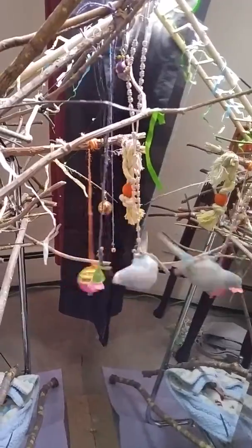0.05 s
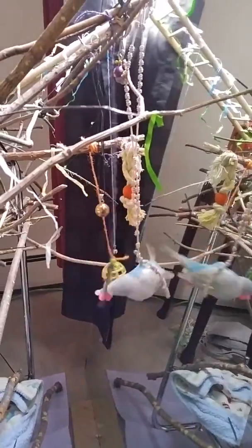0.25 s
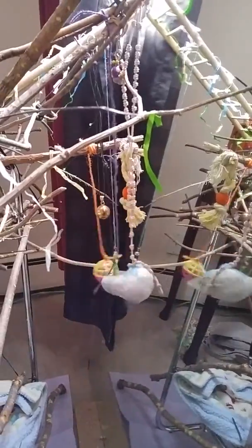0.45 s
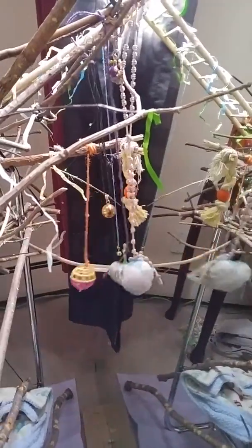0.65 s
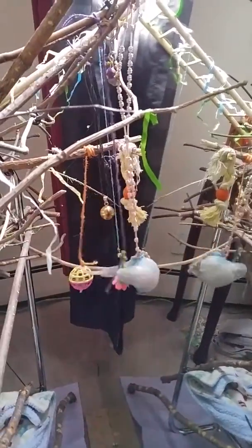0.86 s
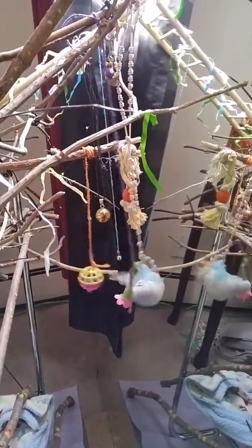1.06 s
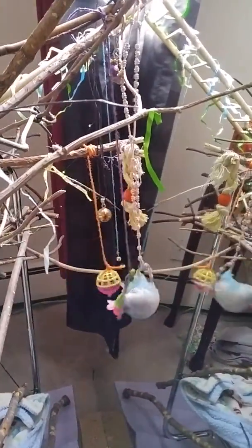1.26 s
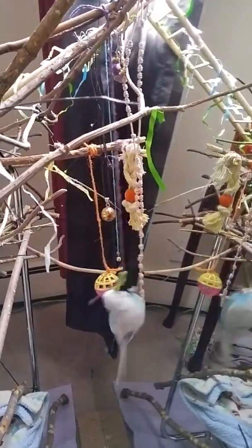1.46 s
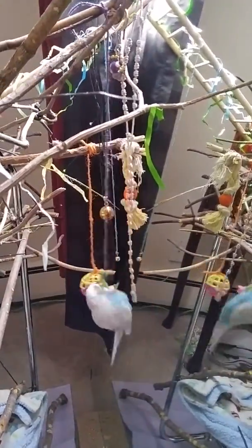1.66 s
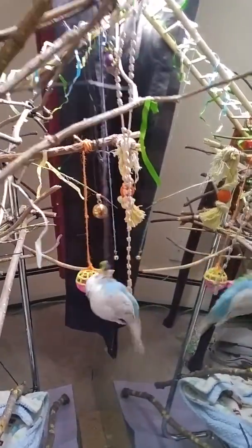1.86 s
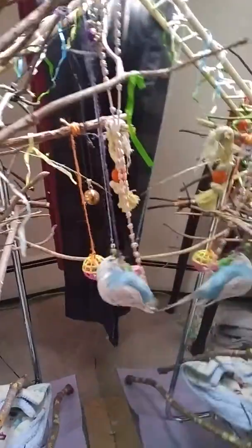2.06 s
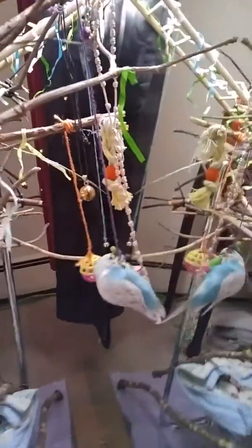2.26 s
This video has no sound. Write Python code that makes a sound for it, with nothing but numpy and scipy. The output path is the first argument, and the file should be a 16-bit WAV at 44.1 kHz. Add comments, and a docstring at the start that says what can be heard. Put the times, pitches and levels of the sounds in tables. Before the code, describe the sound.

High, uneven jingling of a bird's plastic bell ball, with some microphone rubbing at first.

```python
"""Budgie with a bell ball

In a small room a budgie shoves a hanging toy ball: the pellet strikes and rolls in its little bell,
ringing near 10 kHz, and the plastic cage rattles. Right up at the right microphone port something,
probably a finger, rubs and bumps at first. Behind it all, quiet room noise and a faint electrical tick."""
import sys
import numpy as np
from scipy import signal
from scipy.fft import rfft, irfft, next_fast_len
from scipy.io import wavfile
from scipy.ndimage import map_coordinates

SR = 44100
rng = np.random.default_rng(int(sys.argv[2]) if len(sys.argv) > 2 else 0)


def dump_mix(stems):
    """Bounce the given channels to the path in sys.argv[1] as a 16-bit WAV at rate SR."""
    frames = np.atleast_2d(stems).T  # one column per channel
    limited = np.clip(frames, -1, 1)  # hard clip at full scale
    pcm = np.round(limited * 32767).astype(np.int16)
    wavfile.write(sys.argv[1], SR, pcm)


N = 105840

# colour of the room noise (frequency [Hz], level [dB])
ROOM_COLOUR = [(25, 16.5), (50, 15.5), (100, -2), (250, -7.5), (480, -16), (700, -7), (1200, -15.5),
               (2500, -19), (5000, -19.5), (8000, -6), (12000, -19), (16000, -24.5)]
# drift of the room noise (time [s], level [dB])
ROOM_LEVEL = [(0, -61.5), (.8, -54.5), (1, -63), (1.22, -56.5), (1.4, -64.5), (1.8, -63), (2.1, -62.5),
              (2.4, -68)]
# strength of the electrical tick (time [s], level [dB])
TICK_LEVEL = [(.45, -43), (.8, -32.5), (1.1, -41.5), (2.4, -42)]
# course of the rub's body (time [s], level [dB])
RUB_LEVEL = [(0, -74), (.09, -53), (.2, -51), (.3, -52.5), (.34, -47), (.41, -53.5), (.45, -45.5),
             (.54, -44), (.61, -48), (.66, -42), (.75, -54), (.85, -63.5), (.98, -86), (1.15, -68),
             (1.28, -74), (1.35, -80), (1.72, -72), (1.95, -84.5)]
# firmness of the slide, driving hiss and rumble (time [s], level [dB])
RUB_FIRMNESS = [(0, -89), (.12, -80), (.24, -60), (.29, -72.5), (.358, -61.5), (.41, -73.5), (.536, -51.5),
                (.61, -56), (.686, -51.5), (.77, -68), (.9, -80.5), (1.2, -79), (2.4, -102)]
# colour of the rub's body (frequency [Hz], level [dB])
BODY_COLOUR = [(25, -24), (60, -16), (200, -10), (350, -0.5), (440, -6), (520, -23), (620, 1.5), (880, -3),
               (1200, -19.5), (2000, -35), (4000, -44)]
# colour of friction hiss at the port (frequency [Hz], level [dB])
HISS_COLOUR = [(300, -4.5), (1200, 7.5), (2500, -1), (5000, 0), (8500, 8), (11000, -1), (13500, -21),
               (16000, -13)]
# colour of the rub's rumble (frequency [Hz], level [dB])
RUMBLE_COLOUR = [(40, -14), (120, 2), (200, -2), (420, -18), (1500, -47.5)]
# hollow resonance, sinking as the slide goes on (time [s], frequency [Hz])
HOLLOW_PITCH = [(.1, 380), (.19, 362.7), (.28, 219.8), (.6, 171.4)]
# scuffs at the port (time [s], length [s], hiss [dB], thump [dB], thump pitch [Hz])
PORT_SCUFFS = [(0.521, 0.0335, -48, -27.5, 176), (0.647, 0.0237, -37, -32.5, 117.7),
               (0.795, 0.0237, -41, -35.5, 76)]
# modes of the bumped microphone housing (frequency [Hz], level [dB], t60 [s])
HOUSING_MODES = [(170, -15.5, 0.018), (341.8, -11, 0.02), (676.5, -9.5, 0.0093)]
# taps by the right port (time [s], level [dB], centre [Hz], width [octaves])
PORT_TAPS = [(1.042, -46, 680, .7), (1.206, -44, 850, .65), (1.488, -43, 750, .65), (2.043, -43, 300, .95)]
# the bird's tugs at the plastic cage (start [s], length [s], level [dB])
CAGE_TUGS = [(1.248, .04, -52), (1.376, .03, -48.5), (1.422, .026, -52.5), (1.755, .055, -47.5),
             (1.919, .04, -47)]
# colour of the tugged cage's clicks (frequency [Hz], level [dB])
TUG_COLOUR = [(1500, -31.5), (3300, -24), (4200, -3.5), (4700, 1), (5300, -6.5), (6200, -11), (9000, 2),
              (16000, -27)]
# colour of the cage shaken by the pellet (frequency [Hz], level [dB])
CAGE_COLOUR = [(500, -5), (1500, -12.5), (3300, -12), (4200, -4.5), (4700, 3.5), (5300, -0.5), (6200, -5),
               (9000, 2), (16000, -31)]
# toneless part of a pellet contact (frequency [Hz], level [dB])
CLANK_COLOUR = [(2000, -46.5), (6000, -40.5), (7200, -14.5), (7900, -10), (8500, 0.5), (9800, 6.5),
                (10500, -1), (11600, -10.5), (13000, -35), (16000, -40)]
# modes of the bell shell (frequency [Hz], level [dB], t60 [s], share of hardness followed [0-1])
SHELL_MODES = [(8620, -12, .03, 1), (9140, -6, .02, 1), (9540, -7, .022, .5), (9800, -2, .024, .6),
               (9905, 0, .038, 0), (10000, -7, .022, .3), (10130, -11, .018, .8), (11210, 0, .06, 1)]
# clear strikes of the pellet (time [s], level [dB], left minus right [dB], hardness [dB])
PELLET_STRIKES = [(.004, -28, -4, -10), (.336, -20.5, -6, -21), (0.349, -18, -7.5, -18.5),
                  (0.37, -18.5, -3, -24.5), (0.5869, -20, -20, -29), (0.598, -30, -4.5, -5),
                  (0.639, -13, -10.5, -30.5), (0.6499, -17, -11.5, -31.5), (0.784, -33, -4.5, -3.5),
                  (.829, -25, -6.5, -31.5), (0.889, -6, -18.5, -34), (0.8917, -16, -22.5, -5.5),
                  (0.928, -15, -12.5, -15.5), (0.936, -16, -12, -8.5), (0.954, -24.5, -3, -9),
                  (1.009, -15, -14, -21), (1.0134, -28.5, -12.5, -5.5), (1.0787, -21, 1, -8),
                  (1.0876, -17.5, -17, -12.5), (1.1081, -21, -8, -2), (1.1158, -14, -9, -13),
                  (1.1248, -7, -7, -14), (1.141, -21.5, -10, -6), (1.1446, -19, -10, -3.5),
                  (1.151, -12.5, -6.5, -11), (1.185, -3, -6.5, -9), (1.193, -9, -0.5, -9.5),
                  (1.224, -18, -6.5, 1), (1.2302, -31.5, -10.5, 3), (1.248, -33.5, -5.5, -0.5),
                  (1.2608, -25, -9, 7), (1.2618, -24.5, -8.5, -0.5), (1.2712, -23, -6, -1.5),
                  (1.2756, -43.5, 1, 22), (1.286, -29, 5.5, -3), (1.4325, -27, -8.5, -8.5),
                  (1.4379, -23, -17.5, 0.5), (1.4693, -30.5, -3.5, -1), (1.569, -38, 3.5, -9),
                  (1.5787, -28.5, 0.5, -2), (1.7611, -32, 0.5, 8), (1.78, -33.5, -2.5, 4),
                  (1.7834, -40, 10.5, 9), (1.7892, -36.5, -6.5, 2.5), (1.7988, -43.5, -1, 16),
                  (1.918, -32, 15, -8.5), (1.9433, -17.5, 5.5, -9), (1.95, -26.5, 3.5, 2),
                  (1.9668, -42.5, 2, 6.5), (2.073, -32, 8, 1), (2.1159, -39, 5, 3),
                  (2.136, -23.5, 2.5, -4.5), (2.2203, -30.5, 4, -10.5), (2.2402, -31, 4.5, -6),
                  (2.364, -56.5, 1.5, 5)]
# rolls of the pellet (start [s], length [s], level [dB], left minus right [dB], hardness [dB])
PELLET_ROLLS = [(0.358, 0.033, -31, -19, -9.5), (0.409, 0.0712, -48.5, -19, 4),
                (0.589, 0.1066, -30, -2, -9), (0.744, 0.0484, -34, -10, -17.5),
                (0.827, 0.11, -47.5, -3, 1.5), (0.921, 0.0535, -33, 1.5, -8.5),
                (1.003, 0.0143, -32.5, 5, -7.5), (1.063, 0.094, -35.5, -16.5, 1),
                (1.105, 0.076, -46, -7, 10), (1.193, 0.11, -45, -13.5, 11.5), (1.38, 0.014, -52, -7, 18),
                (1.415, 0.107, -57.5, -2.5, 14), (1.438, 0.0121, -29.5, 3.5, -2.5),
                (1.568, 0.0472, -54, -8, 11), (1.627, 0.116, -63.5, 3, 11), (1.649, 0.014, -51.5, -3.5, 12),
                (1.743, 0.1045, -50.5, -2, 10.5), (1.863, 0.065, -57.5, 6.5, -4),
                (1.911, 0.0912, -44.5, -3, 2), (2.051, 0.0328, -68.5, -4.5, 22),
                (2.066, 0.0326, -40.5, 0, 1.5), (2.124, 0.0129, -48.5, 8, -5.5),
                (2.201, 0.0583, -38.5, 2, -11)]


def amp(db):
    """Decibels to gain."""
    return 10 ** (np.asarray(db) / 20)


def unit(x):
    """Scale to rms 1."""
    return x / np.sqrt(np.mean(x ** 2) + 1e-20)


def curve(rows):
    """One value per sample from (time, value) rows."""
    return np.interp(np.arange(N) / SR, *np.transpose(rows))


def filtered(x, response):
    """Pass x through a frequency response."""
    size = next_fast_len(N + 8192)
    return irfft(rfft(x, size) * response(np.fft.rfftfreq(size, 1 / SR)), size)[..., :N]


def coloured(x, colour):
    """Pass x through a (Hz, dB) curve that keeps the power of white noise."""
    knots_hz, db = np.transpose(colour)
    return filtered(x, lambda hz: unit(amp(np.interp(np.log(hz + 1), np.log(knots_hz), db))))


def noise(colour):
    """Coloured noise of rms 1."""
    return unit(coloured(rng.standard_normal(N), colour))


def wobble(rate):
    """A smooth random curve, rate knots a second."""
    return map_coordinates(rng.standard_normal(int(N * rate / SR) + 4), [np.arange(N) * rate / SR])


def panned(pan_db):
    """Left and right gains of mean power 1; positive leans left."""
    gains = amp(np.array([pan_db, -pan_db]) / 2)
    return gains / np.sqrt(np.mean(gains ** 2, axis=0))


def dying(t, t60):
    """A decay that starts at t = 0."""
    return (t >= 0) * np.exp(-np.log(1000) * np.abs(t) / t60)


def ring(times, gains, hz, t60):
    """A stereo resonator kicked at the given times; complex output."""
    samples = np.clip(np.round(times * SR).astype(int), 0, N - 1)
    kicks = np.array([np.bincount(samples, side, N) for side in gains])
    pole = np.exp((2j * np.pi * hz - np.log(1000) / t60) / SR)
    return signal.lfilter([1], [1, -pole], kicks)


def clatter(times, gains, colour, t60):
    """A short toneless burst for each contact, partly alike at the two ports."""
    envelope = np.sqrt(np.abs(ring(times, gains ** 2, 0, t60 / 2)))
    return coloured(envelope * unit(rng.standard_normal(N) + rng.standard_normal((2, N))), colour)


def port_noise(envelope, colour, leak_db):
    """Noise made at the right port; a little reaches the left one."""
    near = noise(colour)
    return envelope * np.array([amp(leak_db) * unit(near + noise(colour)), near])


def on_right(x, leak_db=-31.5):
    """Place x at the right port, with a faint copy on the left."""
    return np.array([amp(leak_db) * x, x])


def room_noise():
    """The room's quiet background, partly shared by the two ports."""
    shared = 0.38 * noise(ROOM_COLOUR)
    separate = np.array([noise(ROOM_COLOUR), noise(ROOM_COLOUR)])
    return amp(curve(ROOM_LEVEL)) * unit(shared + separate)


def electrical_ticks(start_s=.0298, period_s=.1024):
    """A faint, regular electrical tick on the left: a bare click and a brief high ring."""
    times = np.arange(start_s, N / SR, period_s)
    level_db = np.interp(times, *np.transpose(TICK_LEVEL)) + 2 * rng.standard_normal(len(times))
    gains = panned(38.5)[:, None] * amp(level_db)
    ping = ring(times, gains, hz=7090, t60=.0045).real
    click = amp(-8) * ring(times, gains, hz=0, t60=1 / SR).real
    return signal.sosfilt(signal.butter(4, 5800, 'high', fs=SR, output='sos'), ping + click)


def room_tail(x, t60=.0705, delay_s=.0015):
    """The short reflections of a furnished room, different at each port."""
    t = np.arange(SR // 2) / SR
    tail = rng.standard_normal((2, len(t))) * dying(t - delay_s, t60)
    return signal.fftconvolve(x.mean(0)[None], tail / np.linalg.norm(tail[0]), axes=1)[:, :N]


def housing_taps(t60=.024):
    """Light, toneless taps on the microphone housing, by the right port."""
    t = np.arange(N) / SR
    taps = 0
    for start, db, centre, width in PORT_TAPS:
        burst = amp(db) * dying(t - start, t60) * rng.standard_normal(N)
        taps += filtered(burst, lambda hz: unit(np.exp(-.5 * (np.log2((hz + 1) / centre) / width) ** 2)))
    return on_right(taps, leak_db=-56.5)


def housing_bump(time_s=.2279, band_hz=(120, 1325)):
    """One dull, heavily damped knock on the housing by the right port, with a slight crack."""
    t = np.arange(N) / SR - time_s
    thud = sum(amp(db) * np.sin(2 * np.pi * hz * t) * dying(t, t60) for hz, db, t60 in HOUSING_MODES)
    thud = signal.lfilter(*signal.butter(2, band_hz, 'band', fs=SR), thud)
    crack = amp(-33) * dying(t, t60=.016) * noise(HISS_COLOUR)
    return on_right(thud + crack)


def port_rubbing(grain_db=2.5, hollow_width_hz=150, scuff_rise_s=.0019, thump_cycles=5.1):
    """A grainy, hollow slide against the right port, catching in scuffs; firmer adds hiss and rumble."""
    t = np.arange(N) / SR
    grain = unit(amp(grain_db * wobble(350)))
    firmness = grain * amp(curve(RUB_FIRMNESS))
    friction = port_noise(grain * amp(curve(RUB_LEVEL) + 1), BODY_COLOUR, leak_db=-25)
    friction += port_noise(firmness * amp(11), HISS_COLOUR, leak_db=-24)
    friction += port_noise(firmness * amp(5), RUMBLE_COLOUR, leak_db=-25)
    # a narrow band of noise follows the sinking resonance
    band = wobble(hollow_width_hz) + 1j * wobble(hollow_width_hz)
    hollow = band * np.exp(2j * np.pi * np.cumsum(curve(HOLLOW_PITCH)) / SR)
    lows = amp(curve(RUB_LEVEL) - 4) * unit(hollow.real)
    for start, length, hiss_db, thump_db, hz in PORT_SCUFFS:
        age = t - start
        swell = np.interp(age, [0, scuff_rise_s, length / 2, length], [0, 1, 1, 0])
        friction += port_noise(swell * amp(hiss_db), HISS_COLOUR, leak_db=-24)
        lows += amp(thump_db) * np.sin(2 * np.pi * hz * age) * dying(age, thump_cycles / hz)
    return friction + on_right(lows)


def cage_tugs(clicks_per_s=150, scatter_db=4, count=32):
    """Runs of dry clicks as the bird tugs at the plastic cage."""
    times, gains = [], []
    for start, length, db in CAGE_TUGS:
        t = (np.arange(count) + rng.random(count)) / clicks_per_s
        times.append(start + t)
        gains.append((t < length) * amp(db + scatter_db * rng.standard_normal(count)))
    stereo_gains = np.concatenate(gains) * panned(0.82)[:, None]
    return clatter(np.concatenate(times), stereo_gains, TUG_COLOUR, t60=.004)


def pellet_contacts(touches_per_s=420, scatter_db=5, fade_db=7, count=80):
    """Every touch of pellet on shell: the clear strikes and the fading chatter of each roll."""
    rows = [np.array(PELLET_STRIKES)]
    for start, length, db, pan, hardness in PELLET_ROLLS:
        t = (np.arange(count) + rng.random(count)) / touches_per_s
        level = db + scatter_db * np.clip(rng.standard_normal(count), -2, 1.3) - fade_db * t / length
        level = np.where(t < length, level, -np.inf)
        rows.append(np.column_stack([start + t, level, np.full(count, pan), np.full(count, hardness)]))
    return np.vstack(rows)


def shell_ring(times, force, hardness, soft_db=-24, hard_db=-10, rise_s=.004, radiated_hz=(8369, 10035)):
    """The small shell rings in a narrow band; hard contacts bring out side modes and halve the decay."""
    choked = np.interp(hardness, [soft_db, hard_db], [0, 1])
    tone = 0
    for hz, db, t60, follows in SHELL_MODES:
        scatter_db = rng.standard_normal(force.shape)
        kick = force * amp(db + follows * hardness + scatter_db)
        tone += ring(times, kick * (1 - choked), hz, t60)
        tone += ring(times, kick * choked, hz, t60 / 2)
        tone -= (1 - follows) * ring(times, kick, hz, rise_s)  # the main ring takes a moment to build
    tone = np.array([tone[0] * np.exp(1.223j), tone[1]]).imag  # reaches the two ports out of step
    return signal.sosfilt(signal.butter(3, radiated_hz, 'band', fs=SR, output='sos'), tone)


def bell(cage_db_per_db=.653, cage_reference_db=-30.5):
    """Each contact of the pellet rings the shell, clanks and shakes the plastic cage."""
    times, db, pan, hardness = pellet_contacts().T
    force = amp(db) * panned(pan)
    tone = shell_ring(times, force, hardness)
    clank = clatter(times, force * amp(hardness), CLANK_COLOUR, t60=.005)
    shake = amp(cage_db_per_db * (db - cage_reference_db) + hardness) * panned(pan)
    cage = clatter(times, shake, CAGE_COLOUR, t60=.00643)
    return amp(-2.5) * tone + amp(-4.5) * clank + amp(-55) * cage


def scene():
    """The toy out in the room, the handling dry and close at the microphone, the background beneath."""
    toy = bell() + cage_tugs()
    reflections = amp(-3) * room_tail(toy)
    handling = port_rubbing() + housing_bump() + housing_taps()
    return toy + reflections + handling + electrical_ticks() + room_noise()


def record(dry, low_cut_hz=53.3, top_hz=16200):
    """The recorder drops the deepest bass and all above its band limit."""
    low_cut = signal.butter(4, low_cut_hz, 'high', fs=SR, output='sos')
    return filtered(signal.sosfilt(low_cut, dry), lambda hz: hz < top_hz)


dry = scene()
out = record(dry)
dump_mix(out)
```